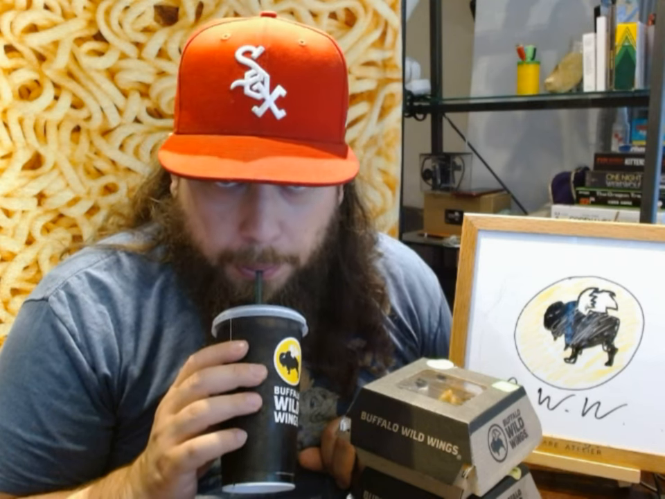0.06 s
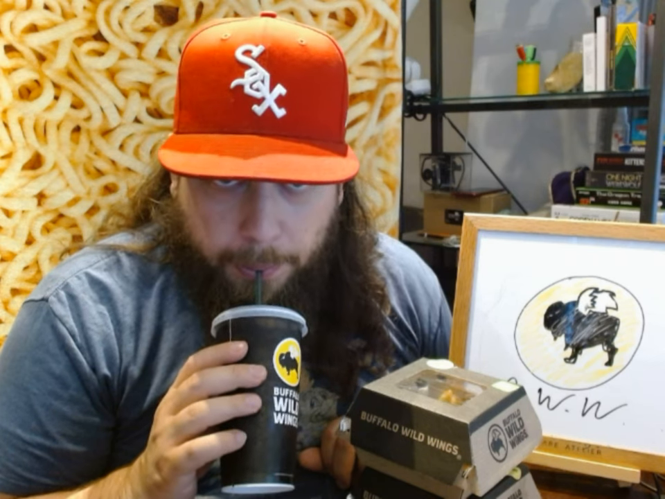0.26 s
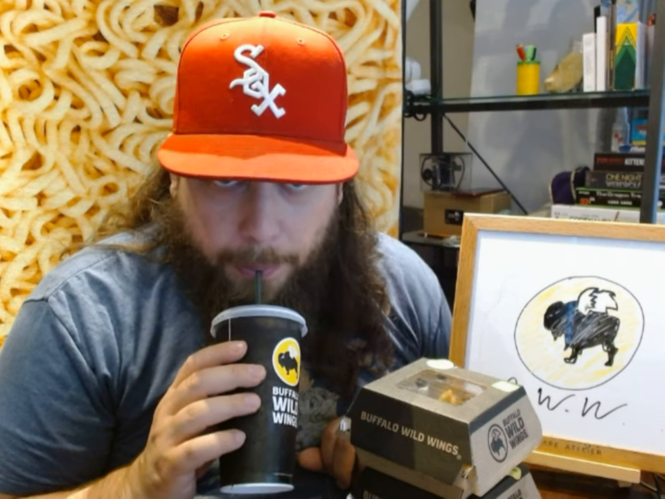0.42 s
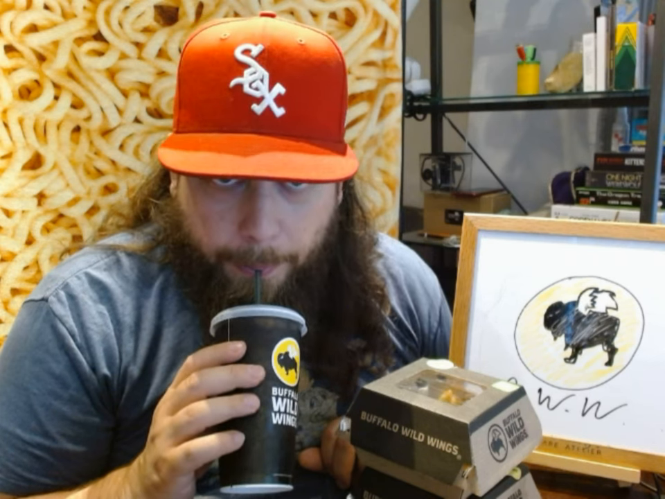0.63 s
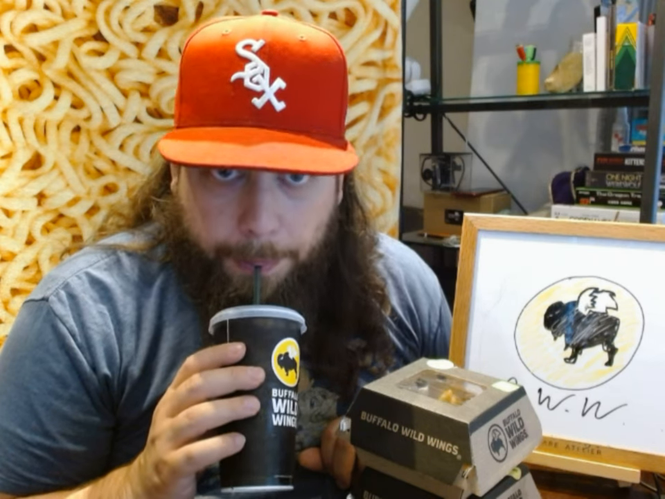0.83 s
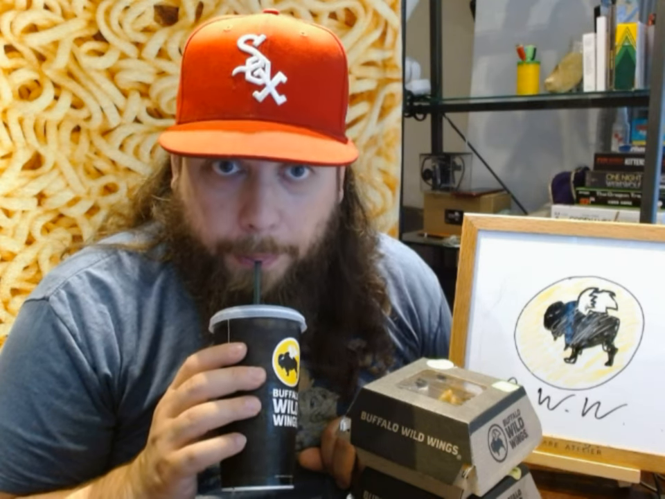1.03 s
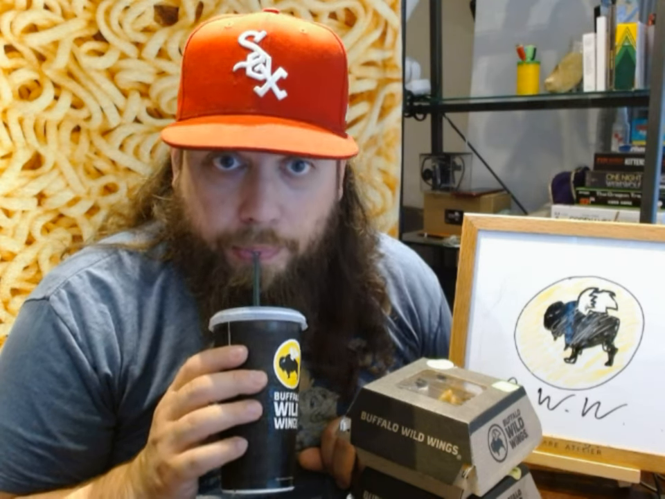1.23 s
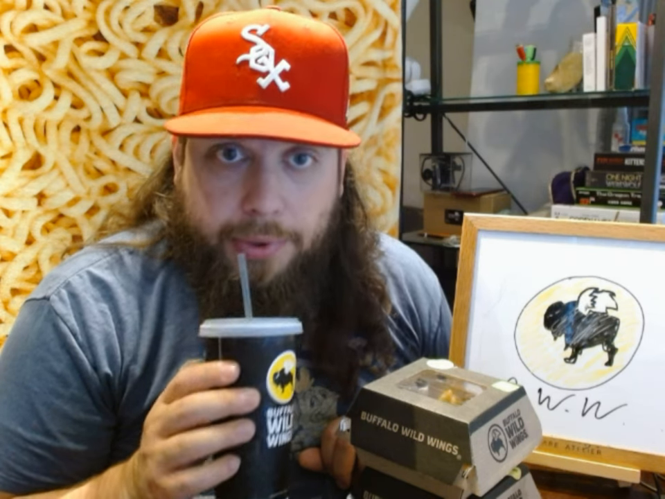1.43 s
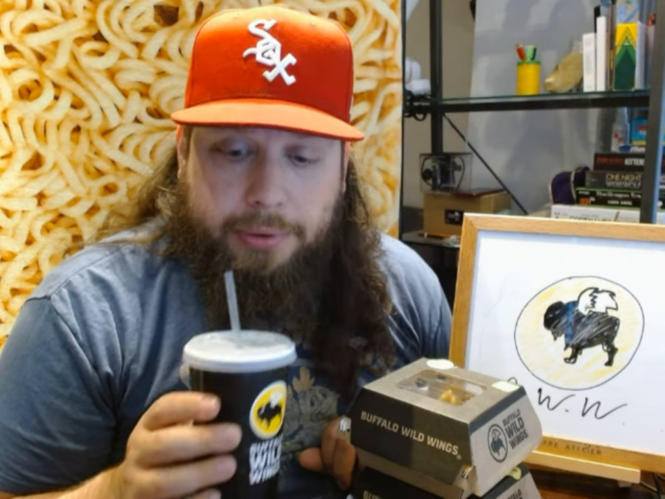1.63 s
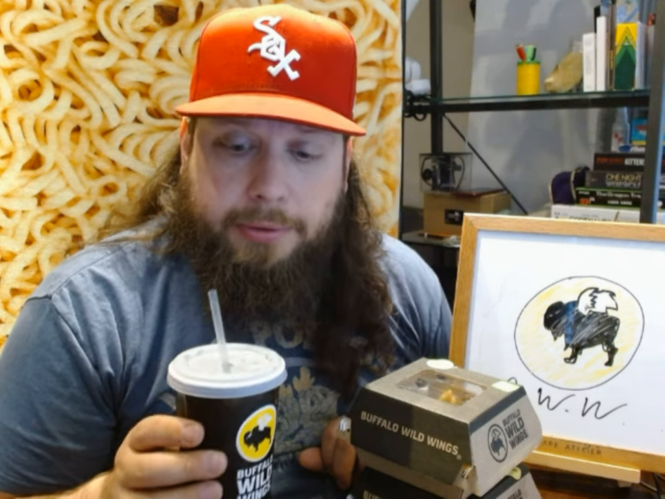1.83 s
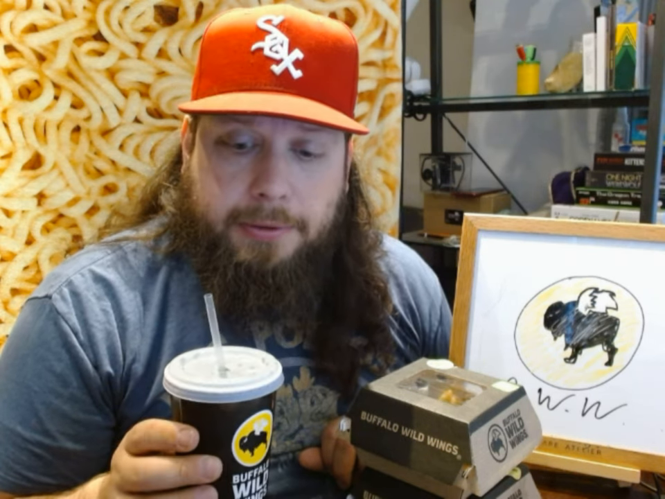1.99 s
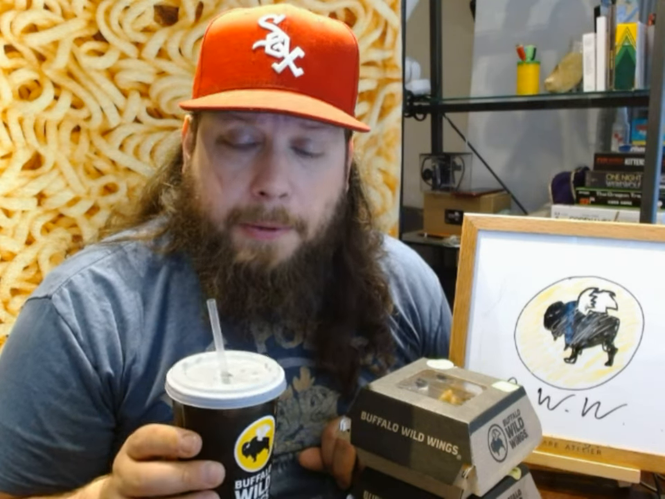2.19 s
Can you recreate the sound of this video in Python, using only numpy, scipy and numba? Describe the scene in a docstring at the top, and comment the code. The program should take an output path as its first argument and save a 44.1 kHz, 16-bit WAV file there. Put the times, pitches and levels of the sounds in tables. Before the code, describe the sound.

A straw squeak in a plastic cup lid is the main sound: at about 1.62 seconds, a very short, loud, raspy chirp drops quickly in pitch and rings briefly. Before it, soft low swallowing and handling thumps, strongest around 0.8 to 1.6, faint lip ticks, and a tiny bubbly sip near 1.3. Two dull thumps follow after 2.1. Quiet room air and faint fan whine continue throughout.

```python
"""Soda is sipped softly through a plastic straw, close to a microphone in a small room.
Bubbles ring the straw as a thin fizzle, and the lips tick faintly, as puffs of noise.
Soft low thumps from swallowing and handling the cup are wavering low tones.
Then the straw slips in the lid: a short stick-slip squeak that falls in pitch and rings lid and cup.
Under it all lie a dull room tone of filtered noise and a thin fan whine."""
import sys
import numpy as np
from scipy import signal
from scipy.fft import rfft, irfft, next_fast_len
from scipy.io import wavfile
from scipy.ndimage import uniform_filter1d, map_coordinates
from numba import njit

SR = 44100
rng = np.random.default_rng(int(sys.argv[2]) if len(sys.argv) > 2 else 0)


def file_out(sig):
    """Save sig as 16-bit WAV at sys.argv[1]."""
    # one column per channel
    cols = np.atleast_2d(sig).T
    # limit, then scale
    lim = np.clip(cols, -1, 1)
    pcm = np.round(lim * 32767).astype(np.int16)
    wavfile.write(sys.argv[1], SR, pcm)


N = 99269


def undb(db):
    """Decibels to gain."""
    return 10 ** (np.asarray(db) / 20)


def unit(x):
    """Scale to rms 1."""
    return x / np.sqrt(np.mean(x ** 2) + 1e-20)


def times():
    """Time of every sample in seconds."""
    return np.arange(N) / SR


def envelope(at, db):
    """Gain along a dB curve, silent outside it."""
    return undb(np.interp(times(), at, db, left=-200, right=-200))


def steady(x, size=220):
    """Even out the level of a texture over a few milliseconds (size in samples)."""
    power = np.abs(uniform_filter1d(x ** 2, size))
    return x / np.sqrt(power + 1e-12)


def colour(x, points):
    """Causal minimum-phase filter with the given (Hz, dB) shape, made by folding the cepstrum."""
    hz, db = np.array(points, float).T
    size = 2 * next_fast_len(N)
    f = np.maximum(np.fft.rfftfreq(size, 1 / SR), 1)
    gain = undb(np.interp(np.log(f), np.log(hz), db))
    cepstrum = irfft(np.log(gain))
    cepstrum[1:size // 2] *= 2
    cepstrum[size // 2 + 1:] = 0
    response = np.exp(rfft(cepstrum))
    return irfft(rfft(x, size) * response)[:N]


@njit
def resonate(x, hz, width):
    """Band-pass whose centre may move: a state-variable filter, width in Hz."""
    y, band, low = np.empty(len(x)), 0., 0.
    for i in range(len(x)):
        g, damping = np.tan(np.pi * hz[i] / SR), width / hz[i]
        v = (band + g * (x[i] + 1e-18 - low)) / (1 + g * (g + damping))
        band = 2 * v - band
        low = low + 2 * g * v
        y[i] = damping * v
    return y


def ring(x, hz, width):
    """Fixed resonance, with the same power at any width."""
    return resonate(x, np.full(N, float(hz)), float(width)) / np.sqrt(width)


def walk(rate, count=8000):
    """Smooth random drift with a spread near 1, from rate random points a second."""
    return map_coordinates(rng.standard_normal(count), [times() * rate], mode="wrap")


def clicks(rate, jitter, scatter_db, count=6000):
    """Train of clicks, uneven in spacing and size; the median gap is 1 / rate."""
    gap, size = rng.standard_normal((count, 2)).T
    at = (np.cumsum(np.exp(jitter * gap)) * SR / rate).astype(int)
    inside = at < N
    return np.bincount(at[inside], undb(scatter_db * size[inside]), N)


def burst(start, db, decay):
    """A sudden, dying puff of noise."""
    age = times() - start
    fade = (age > 0) * np.exp(-np.abs(age) / decay)
    return undb(db) * fade * rng.standard_normal(N)


def stereo(mid, side):
    """Left and right from mid and side."""
    return np.array([mid + side, mid - side])


def room_tone():
    """Dull steady air is filtered noise, wider in the treble; the thin fan whine is drifting sines."""
    # Tilt of the air in the room. Each row: frequency in Hz, relative density in dB per Hz.
    air_tint = [(20, 15.5), (60, 11), (110, 8.5), (155, 0), (220, 2), (380, -6), (540, -4), (900, -7.5),
                (1500, -15.5), (3200, -25), (5000, -30.5), (8000, -40), (15000, -44)]
    # Steady whine of a fan. Each row: frequency in Hz, level in dB.
    fan_tones = [(1014, -78), (3215, -95)]
    air_db, side_hz = -59, 1781
    mid, side = (colour(rng.standard_normal(N), air_tint) for _ in range(2))
    high_pass = signal.butter(1, side_hz, "high", fs=SR, output="sos")
    wide = signal.sosfilt(high_pass, side)
    out = undb(air_db) * stereo(mid, wide + .15 * side) / np.std(mid)
    for hz, db in fan_tones:
        phase = 2 * np.pi * np.cumsum(hz * (1 + 0.0068 * walk(24))) / SR
        tone = np.sin(phase) * undb(1.5 * walk(20))
        out = out + undb(db) * unit(tone)
    return out


def thumps():
    """Swallowing and handling the cup: each thump swells and dies as a wavering low tone."""
    # Low thumps. Each row: peak in seconds, pitch in Hz, level in dB, rise in s, decay in s.
    thump_rows = [(.078, 63, -40.5, 0.01334, 0.034965), (.23, 54.95, -55, 0.02664, 0.033),
                  (.375, 67, -51, 0.0656, 0.1181), (.795, 68, -36.5, 0.01083, 0.03942),
                  (.94, 64, -49, 0.04825, 0.07856), (1.055, 65, -35.5, 0.01837, 0.02325),
                  (1.156, 66, -32, 0.025216, 0.04027), (1.26, 67, -37.5, 0.019675, 0.03134),
                  (1.375, 54, -38.5, 0.03663, 0.03156), (1.495, 54, -40.5, 0.02612, 0.019784),
                  (1.565, 54, -40.5, 0.018457, .035), (1.615, 38, -42, 0.013, 0.0576),
                  (1.745, 40, -48, .025, 0.02195), (1.82, 59.49, -57, .015, 0.043),
                  (2.135, 58, -40, 0.022504, 0.02812), (2.245, 42, -37.5, .022, 0.02317)]
    wander, overtone_db, side_db = 0.063, -17, -18.5  # wander as a fraction of the pitch
    out = 0
    for peak, hz, db, rise, decay in thump_rows:
        age = times() - peak
        swell = np.where(age < 0, np.exp(-(age / rise) ** 2), np.exp(-np.abs(age) / decay))
        phase = 2 * np.pi * np.cumsum(hz * (1 + wander * walk(40))) / SR
        tone = np.sin(phase) + undb(overtone_db) * np.sin(1.75 * phase)
        side = undb(side_db) * np.cos(phase)
        out = out + np.sqrt(2) * undb(db) * swell * stereo(tone, side)
    return out


def sip():
    """Tiny bubbles and a few larger ones ring the straw's air; the lips tick faintly."""
    # Faint wet ticks at the lips. Each row: start in seconds, level in dB, decay in s.
    lip_ticks = [(.366, -83.5, .006), (.38, -74.5, .006), (0.667, -77.5, .06), (1.249, -84, .04),
                 (1.46, -76.5, .015)]
    # Air and soda fizzling in the straw. Each row: time in seconds, level in dB.
    fizz_level = [(1.245, -93.5), (1.276, -77.5), (1.283, -65), (1.299, -60.5), (1.312, -58),
                  (1.325, -60.5), (1.333, -62.5), (1.338, -57.5), (1.363, -68), (1.376, -81), (1.398, -89),
                  (1.423, -79), (1.45, -90), (1.51, -94.5)]
    # Small bubbles bursting in the straw. Each row: start in seconds, level in dB.
    bubble_pops = [(1.3032, -53.5), (1.3115, -45.5), (1.3365, -52.5), (1.467, -61)]
    # Resonances of the straw. Each row: frequency in Hz, width in Hz, relative level in dB.
    straw_modes = [(5310, 87, -11.5), (5731.6, 120, 0.5), (6680, 71, -10), (6983.3, 130, -6.5),
                   (7700, 60, -18.5)]
    # Colour of the wet sounds. Each row: frequency in Hz, relative level in dB.
    wet_tint = [(800, -9), (2400, -2.5), (3600, 0), (6000, -3.5), (7500, -17)]
    fizz_per_s, scatter_db, body_db = 550, 0.5, -16.5
    pop_decay_s, straw_band_hz = .002, 220

    fizz = steady(clicks(fizz_per_s, 1.0, scatter_db) * rng.standard_normal(N))
    fizz = fizz * envelope(*np.array(fizz_level).T)
    drive = fizz + sum(burst(start, db, pop_decay_s) for start, db in bubble_pops)
    tube = 0
    for hz, width, db in straw_modes:
        mode = ring(ring(drive, hz, straw_band_hz), hz, width)
        tube = tube + undb(db) * unit(mode)
    body = undb(body_db) * unit(colour(drive, wet_tint))
    lips = sum(burst(*row) for row in lip_ticks)
    wet_lips = np.std(lips) * unit(colour(lips, wet_tint))
    return np.std(drive) * (unit(tube) + body) + wet_lips


def squeak():
    """Stick-slip: slips drive a falling straw resonance that sings unsteadily, rasp and ring the lid."""
    # Straw sliding in the lid. Each row: time in seconds, resonance of the straw in Hz, level in dB.
    slide = [(1.6155, 6890, -24.5), (1.6192, 6732, -15), (1.628, 5733, -16.5), (1.635, 5425, -15.5),
             (1.639, 5225, -20.5), (1.6455, 4792, -16.5), (1.6479, 4710, -33.5), (1.66, 4050, -31.5),
             (1.674, 3807, -35), (1.684, 3700, -54.5)]
    # Colour of the slips in the lid. Each row: frequency in Hz, relative level in dB.
    rasp_tint = [(300, -62), (800, -55), (1450, -48), (1950, -24), (2300, -12), (3600, -7), (4350, -14.5),
                 (4850, 0.5), (6900, -2), (7300, -10), (8000, -11.5)]
    # Modes of lid and cup. Each row: frequency in Hz, relative level in dB, time to fall 60 dB in s,
    # left over right in dB.
    lid_modes = [(1003.1, -19.5, 0.20297, 3), (1210, -25.5, 0.063, 0.5), (1835.5, -20.5, .14, -21.5),
                 (2150, -15.5, 0.064, -15), (2317.8, -6, .08, -1.5), (2620, -10.5, .1, 1),
                 (2810, -11.5, .1, 1), (3500, -3.5, 0.19, 0), (4858, 0.5, 0.082, 0.5),
                 (5335, -1.5, 0.11, 1), (5740, 2, .1, 0.5), (5935, -8, .1, 0.5), (6450, -2.5, 0.083, -1.5),
                 (6950, -2, .1, -3)]
    slips_per_s, slip_jitter, slip_scatter_db, slip_decay_s = 522.31, 0.22, 5, .0009
    straw_width_hz, lid_band_hz = 1500.0, 350
    straw_db, sing_db, rasp_db, lid_db, side_db = -5, -2, -4, -9, -7.5
    wobble, wobble_per_s, flutter_db = .035, 1000, 2.5  # wobble as a fraction of the pitch
    right_lag_s = .000018

    at, hz, db = np.array(slide).T
    pitch, force = np.interp(times(), at, hz), envelope(at, db)
    slips = clicks(slips_per_s, slip_jitter, slip_scatter_db)
    straw = resonate(resonate(slips, pitch, straw_width_hz), pitch, straw_width_hz)
    straw = undb(straw_db) * steady(straw)

    unsteady_pitch = pitch * (1 + wobble * walk(wobble_per_s))
    phase = 2 * np.pi * np.cumsum(unsteady_pitch) / SR
    sing = undb(sing_db) * steady(np.sin(phase) * undb(flutter_db * walk(900)))

    # each slip dies away quickly
    grip = signal.lfilter([1], [1, -np.exp(-1 / (slip_decay_s * SR))], slips)
    rasp, side = (steady(colour(grip * rng.standard_normal(N), rasp_tint)) for _ in range(2))

    drive = force * steady(grip * rng.standard_normal(N))
    lid = 0
    for mode_hz, mode_db, t60, pan_db in lid_modes:
        width = np.log(1000) / np.pi / t60
        mode = unit(ring(ring(drive, mode_hz, lid_band_hz), mode_hz, width))
        lid = lid + mode * undb(mode_db + np.array([[pan_db], [-pan_db]]) / 2)
    lid = unit(lid) * np.std(drive) * undb(lid_db)

    mid = straw + sing + undb(rasp_db) * rasp
    left, right = force * stereo(mid, undb(side_db) * side) + lid
    late_right = map_coordinates(right, [(times() - right_lag_s) * SR])
    return np.array([left, late_right])


def room(x):
    """Short diffuse tail of a small room: decaying noise, different at each side."""
    # Colour of the room's tail. Each row: frequency in Hz, level in dB.
    tail_tint = [(2400, 0), (4000, 1.5), (5600, 0), (7000, 0.5), (8000, -5)]
    t60_s, tail_db, gap_s, build_s = 0.30929, -13, 0.002, .007
    age = np.maximum(times()[:SR // 2] - gap_s, 0)
    fade = np.exp(-np.log(1000) * age / t60_s) * (1 - np.exp(-age / build_s))
    tails = rng.standard_normal((2, len(age))) * fade / np.sqrt(np.sum(fade ** 2))
    sent = colour(x.mean(axis=0), tail_tint)
    return x + undb(tail_db) * signal.fftconvolve(sent[None], tails, axes=1)[:, :N]


def scene():
    """Sip and squeak in the room, dull above the microphone's band, over thumps and room tone."""
    band_hz = 7600
    low_pass = signal.ellip(8, .3, 80, band_hz, fs=SR, output="sos")
    near = signal.sosfilt(low_pass, room(squeak() + sip()))
    return near + thumps() + room_tone()


def record(dry):
    """The recorder cuts the top with a steep low-pass."""
    top_hz = 15700
    low_pass = signal.ellip(8, .2, 70, top_hz, fs=SR, output="sos")
    return signal.sosfilt(low_pass, dry)


dry = scene()
out = record(dry)
file_out(out)
```